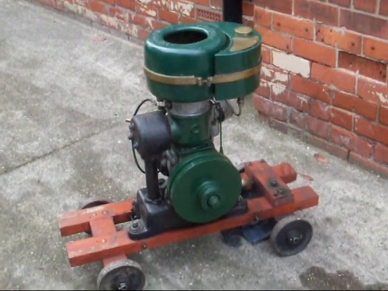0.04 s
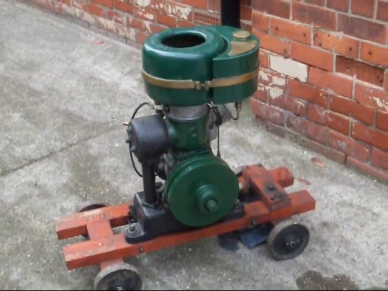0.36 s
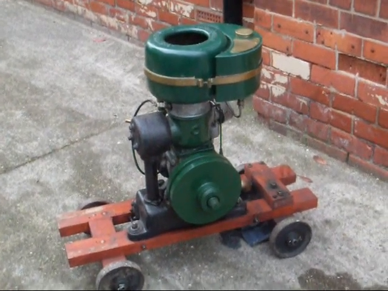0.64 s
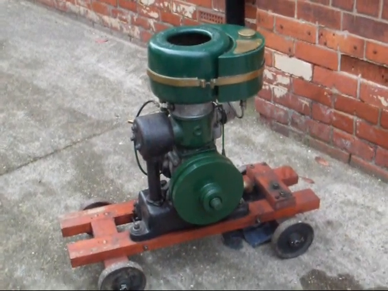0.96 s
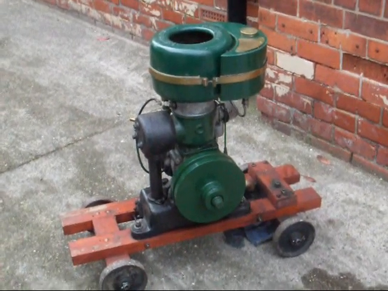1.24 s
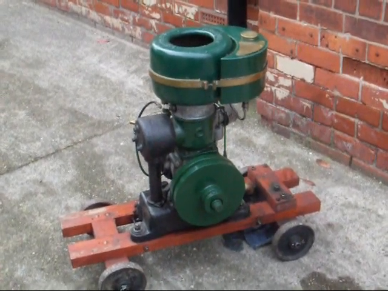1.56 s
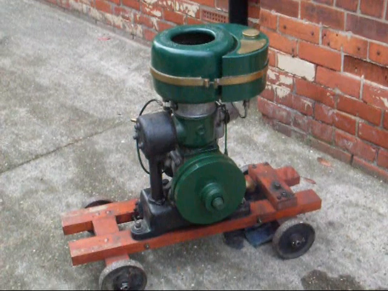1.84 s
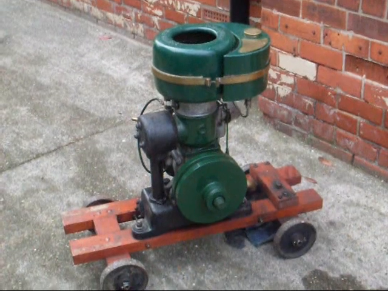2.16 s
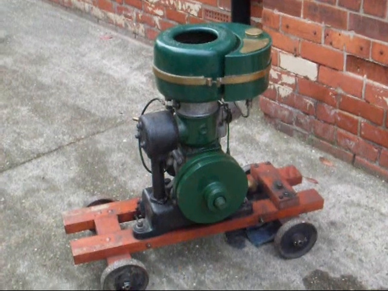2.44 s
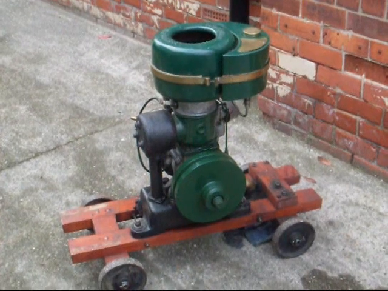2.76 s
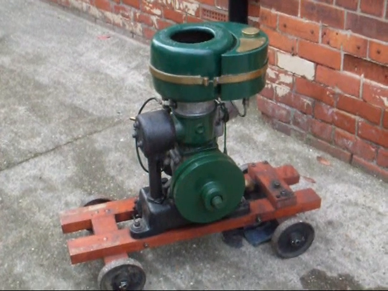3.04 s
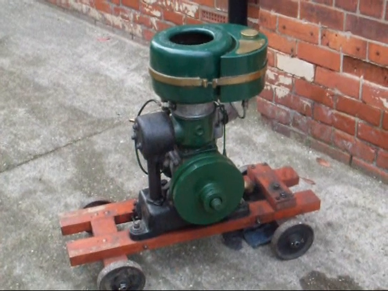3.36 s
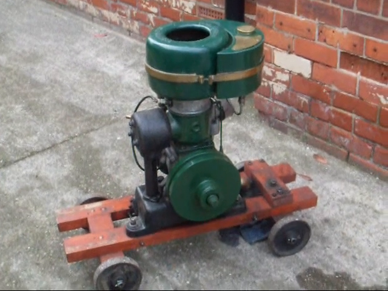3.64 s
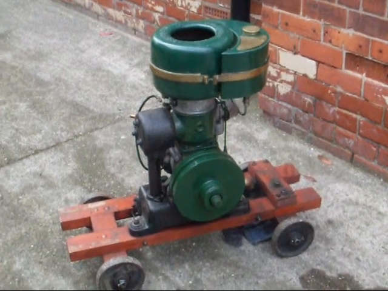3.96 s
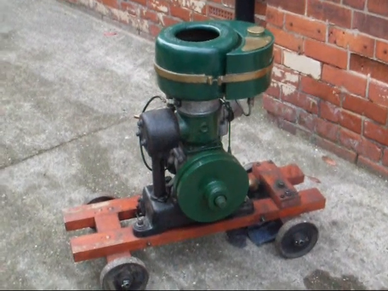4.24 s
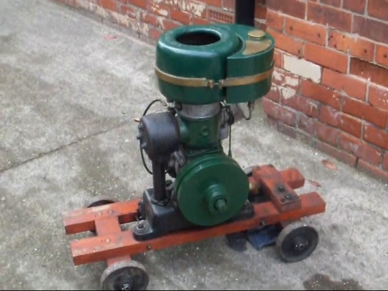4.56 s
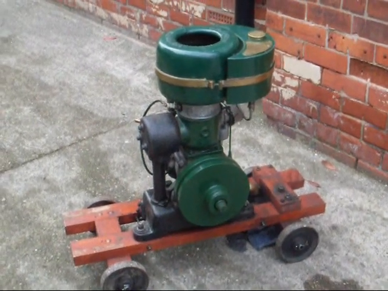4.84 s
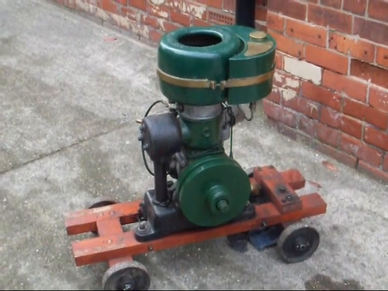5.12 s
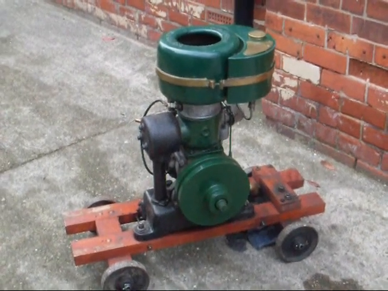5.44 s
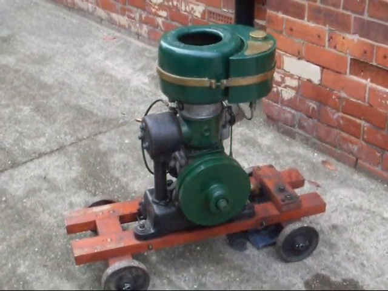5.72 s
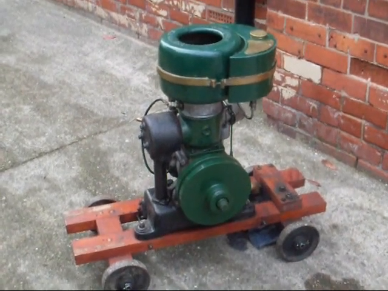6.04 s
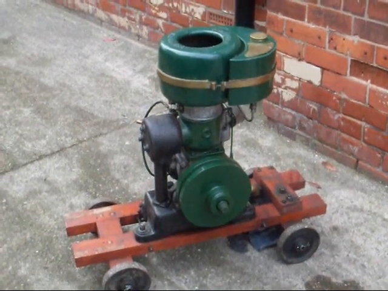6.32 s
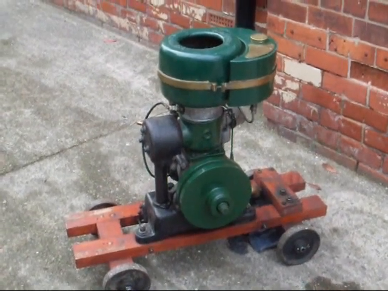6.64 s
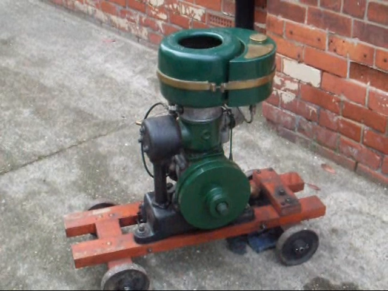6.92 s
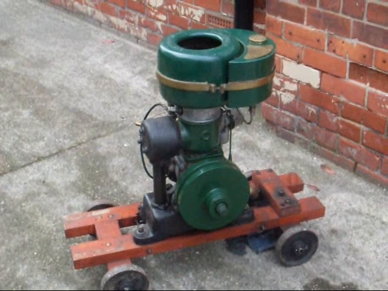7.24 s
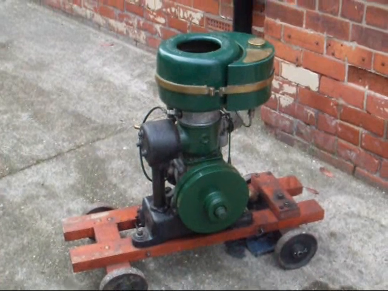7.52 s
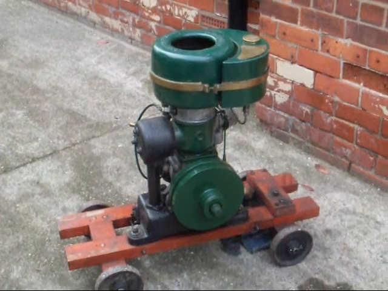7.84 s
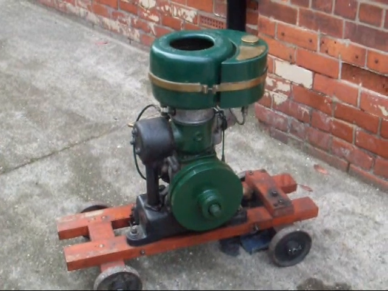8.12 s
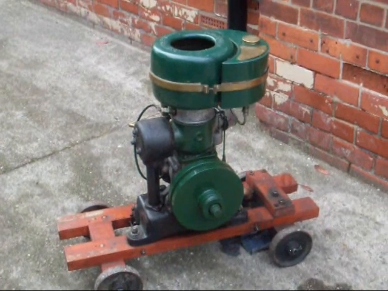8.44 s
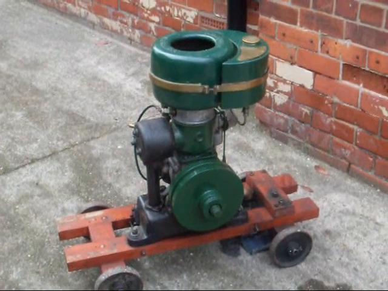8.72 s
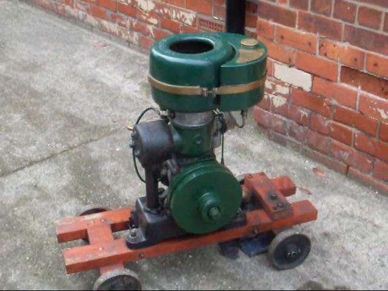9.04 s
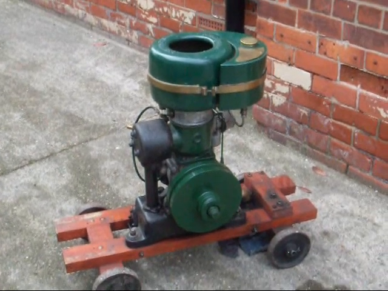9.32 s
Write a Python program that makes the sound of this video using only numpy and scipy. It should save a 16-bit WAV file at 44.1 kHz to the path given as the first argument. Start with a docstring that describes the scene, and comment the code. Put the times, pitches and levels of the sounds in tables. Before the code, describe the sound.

A small single-cylinder stationary engine idles outdoors with rapid low puffs, a mechanical churn and a pulsing, whistling intake hiss. About once a second it fires two or three sharp bangs, then coasts. Past the middle a faint whine rises, a quick run of bangs follows, and the hiss drops away for a while. Paired bangs return as wind gusts buffet the microphone, each bang echoing briefly around the yard.

```python
"""A small single-cylinder stationary engine idles on concrete beside a brick wall, about 17 turns a second.
Now and then a charge fires: a pressure pulse and a turbulent jet excite the exhaust pipe's resonances,
and between firings the crank coasts. On every turn, turbulence makes the intake hiss and whistle, and
the exhaust puffs; after one quick run of bangs the intake falls quiet for a while. The yard returns
echoes, a faint hum wavers, and gusts buffet the microphone."""
import sys
import numpy as np
from scipy import signal
from scipy.fft import rfft, irfft
from scipy.io import wavfile

SR = 44100
rng = np.random.default_rng(int(sys.argv[2]) if len(sys.argv) > 2 else 0)


def inscribe(sig):
    """Save sig as 16-bit PCM at rate SR to the path in sys.argv[1].

    A 1-D sig is mono; a 2-D sig holds one channel per row.
    Samples are clipped to [-1, 1] before scaling.
    """
    pcm = np.round(np.clip(np.atleast_2d(sig).T, -1, 1) * 32767)
    wavfile.write(sys.argv[1], SR, pcm.astype(np.int16))


N = 422478
TIME = np.arange(N) / SR
FILTER_HZ = np.fft.rfftfreq(8192, 1 / SR)
IDLE_TURNS_PER_S = 16.8

# Levels in the tables are relative: each source applies its own gain.
# gusts at the microphone: start_s, length_s, level_db
WIND_GUSTS = [(1.158, .017, -23.5), (1.322, 0.16, -37.5), (1.719, .075, -26.5), (2.238, .25, -41),
              (4.8, .18, -33.5), (5.294, 0.0089, -21.5), (5.718, 0.187, -39), (6.979, 0.05, -31),
              (7.023, 0.013, -26), (7.115, 0.13, -33), (7.256, 0.35, -30), (7.75, 0.018, -23),
              (8.104, 0.077, -17), (8.16, .12, -22), (8.284, 0.078, -23), (8.521, 0.13, -21),
              (8.712, 0.18, -29), (9.028, 0.25, -20), (9.069, .02, -15), (9.251, 0.45, -28),
              (9.356, 0.014, -20)]
# envelope of the hum: time_s, level_db
HUM_LEVEL = [(0, -58), (2, -49), (4.5, -50), (5.2, -68), (9.6, -57)]
# reflections from ground, wall and house: delay_s, gain
REFLECTIONS = [(.0016, 1), (.0039, -1.4), (.0061, 0.98), (0.0174, -0.34), (0.0193, 0.22), (0.0205, 0.64),
               (0.036, 0.32)]
# reverberation time of the yard: frequency_hz, t60_s
YARD_DECAY = [(100, 0.82), (300, 0.31), (620, 0.055), (1400, 0.15), (3700, 0.33), (10000, 0.25)]
# broad spectra of the noises and pulses: frequency_hz, level_db
WIND_SPECTRUM = [(20, -40), (60, -2.5), (130, 2), (250, 3), (450, -3), (700, -9.5), (1200, -20),
                 (2500, -60), (11000, -65)]
CHURN_SPECTRUM = [(20, -12), (35, -1), (55, 7), (130, 5.5), (210, -13.5), (450, -5), (1000, -5), (1500, -6),
                  (2100, -13), (3400, -16), (5500, -23.5), (8000, -24.5), (11000, -32)]
PUFF_SPECTRUM = [(20, -19), (35, -8), (50, 0), (65, 1.5), (100, -3.5), (150, 1), (210, -11), (400, -12),
                 (900, -40), (3000, -48), (11000, -64)]
HISS_SPECTRUM = [(30, 2), (300, -2.5), (600, 8), (1200, 5), (2000, 4), (2800, 7.5), (4200, -5.5),
                 (5300, -27.5), (7000, -19.5), (11000, -52)]
SIZZLE_SPECTRUM = [(30, -50), (3000, -5), (5300, -5), (6300, -4.5), (8000, 2.5), (9500, -7.5),
                   (11000, -4.5)]
CRACK_SPECTRUM = [(30, -29), (250, -10), (700, -1), (1100, -3), (2000, -7.5), (2700, -6.5), (3600, -9),
                  (5000, -9), (6200, -14.5), (8200, -12.5), (10000, -14), (11000, -14.5)]
THUMP_SPECTRUM = [(25, -70), (60, -4), (120, -6), (250, 1), (420, 1.5), (680, 1.5), (900, -0.5),
                  (1400, -10.5), (3000, -53), (11000, -79)]
# resonances of the iron casing and of the exhaust pipe: centre_hz, width_hz, gain_db
CASING_MODES = [(422.5, 20, 8.4), (587, 68, 6.4), (775, 7.6, 10.3), (985, 74, 6.6), (1216, 71, 5.3),
                (1410, 40, 2.9), (1723, 25, 8.3), (2550, 280, 4.5)]
PIPE_MODES = [(100, 55, 13), (136, 67, 3), (245.4, 30, 10.5), (296, 27, 5), (410, 94, 9), (550, 38, 7),
              (615, 210, 1), (740, 133, 3.5), (787, 67, 4.5), (910, 160, 4), (1280, 48, 3),
              (1470, 230, 2.5), (1710, 70, 9), (1840, 24, 8.5), (2343, 107, 7), (2537, 350, 4),
              (2712, 98, 8), (2900, 190, -3.5), (3550, 230, 8.5), (4270, 22, 4), (7180, 230, 5.5),
              (8240, 61, 7.5)]
# strength of the suction, which collapses after the quick run: time_s, level_db
SUCTION = [(0, -1.5), (1.8, 1.5), (3.4, 0.5), (5.5, 1.5), (6.05, -1), (6.6, -5), (6.85, -15), (7.5, -12),
           (7.85, -8.5), (8.5, -6.5), (8.95, 1), (9.6, 0.5)]
# air speed at the throttle, as the level of the throat tones: time_s, level_db
THROTTLE_FLOW = [(0, -14), (4.4, -13), (4.9, -7), (5.3, -3), (5.7, 0), (6.0, -3), (6.4, -2), (6.65, -18),
                 (8.5, -18), (9.6, -13)]
# tones of the carburettor throat: pitch_hz, level_db
THROAT_TONES = [(1240, -33.5), (1420, -42.5), (2140, -38.5), (2720, -41), (3200, -39), (4100, -34)]
# intake whistle: time_s, pitch_hz
WHISTLE_PITCH = [(.4, 6850), (.85, 6940), (1.15, 6840), (1.75, 6900), (3.0, 7075), (3.7, 7050), (6.0, 7270),
                 (7.6, 7050), (8.8, 6980), (9.5, 7030)]
# thin whine while the engine labours: time_s, level_db, pitch_hz
LABOUR_WHINE = [(4.6, -74, 3900), (5.0, -62, 3800), (5.4, -55, 3760), (5.85, -52, 3720), (6.2, -55, 3660),
                (6.6, -85, 3650)]
# fired charges: start_s, coasted_turns (since the last firing; rounded in use), crack_db, thump_offset_db
FIRINGS = [(0.0014, 0, -10, -3), (0.0594, 0.5, -18, -1), (0.115, 1, -26, -5), (0.8628, 13, -24, -0.5),
           (0.9213, 1.5, -10, -2.5), (0.9789, 1.5, -29.5, 0), (1.8003, 14, -21.5, -3.5),
           (1.8594, 1.5, -13, -1.5), (1.919, 1, -21, -2.5), (2.6799, 13, -12, -2), (2.74, 0, -18, 0),
           (2.8528, 2, -20, -6), (3.2577, 7, -21, -5), (3.3174, 1, -22.5, -1.5), (3.7942, 8, -12.5, 0),
           (3.8541, 1, -17, -4), (3.9113, 0.5, -26.5, -2), (4.6947, 13, -22.5, -5.5),
           (4.7552, 1, -15, -0.5), (5.6029, 13, -19.5, -1.5), (6.0394, 6, -20.5, -2), (6.115, 1, -13, -1.5),
           (6.1857, 0.5, -16.5, -1.5), (6.2526, 0, -18, -4), (6.314, 1, -16.5, -2.5),
           (6.375, 0.5, -17.5, -3), (6.4308, 0, -17, -3), (6.4849, 1, -15.5, -1), (6.538, 2.5, -20, -5.5),
           (6.5925, 0.5, -32, 7), (6.644, 0.5, -35.5, 6), (7.8933, 22, -7.5, -4.5), (7.9512, 3, -23.5, 0),
           (8.6593, 12.5, -12.5, -3), (8.7817, 2, -18.5, -2), (9.207, 7, -10, -2), (9.3254, 2.5, -21, -2)]


def amp(db):
    """Amplitude ratio of a level in decibels."""
    return 10 ** (np.asarray(db) / 20)


def spectrum_at(points, hz):
    """Linear interpolation on a logarithmic frequency axis."""
    point_hz, value = np.transpose(points)
    return np.interp(np.log(hz + 1), np.log(point_hz), value)


def curves(rows):
    """Linear interpolation in time of each column of a table."""
    time_s, *columns = np.transpose(rows)
    return [np.interp(TIME, time_s, column) for column in columns]


def add(mix, start_s, sound):
    """Superposition of a sound on the mix."""
    part = mix[max(round(start_s * SR), 0):][:len(sound)]
    part += sound[:len(part)]


def wander(cutoff_hz):
    """Random modulation: low-passed noise of rms 1."""
    rolloff = 1 + (np.fft.rfftfreq(N, 1 / SR) / cutoff_hz) ** 4
    drift = irfft(rfft(rng.standard_normal(N)) / rolloff, N)
    return drift / np.sqrt(np.mean(drift ** 2) + 1e-20)


def tone(hz, jitter_rad, jitter_hz):
    """Random phase modulation broadens the spectral line of a sine of rms 1."""
    return np.sqrt(2) * np.sin(2 * np.pi * np.cumsum(hz) / SR + jitter_rad * wander(jitter_hz))


def colour(x, spectrum, modes=()):
    """Minimum-phase filter of unit energy: a broad spectrum with resonance peaks on top."""
    peaks_db = sum(db / (1 + (2 * (FILTER_HZ - hz) / width) ** 2) for hz, width, db in modes)
    db = spectrum_at(spectrum, FILTER_HZ) + peaks_db
    log_gain = np.log(amp(np.r_[db, db[-2:0:-1]]))
    response = np.exp(np.conj(signal.hilbert(log_gain)))
    taps = np.fft.ifft(response).real[:len(FILTER_HZ)]
    return signal.oaconvolve(x, taps / np.linalg.norm(taps))[:N]


def resonator(x, hz, width_hz):
    """A double-pole resonance of unit energy passes a narrow band around a moving pitch."""
    carrier = np.exp(2j * np.pi * np.cumsum(hz) / SR)
    pole = np.exp(-np.pi * width_hz / SR)
    energy = (1 + pole ** 2) / (1 - pole ** 2) ** 3
    baseband = signal.lfilter([1], [1, -2 * pole, pole ** 2], x / carrier + 1e-18)
    return (carrier * baseband).real * np.sqrt(2 / energy)


def wind(slaps_per_s=70, breeze_db=-49, swell_db=3.5):
    """Turbulent pressure at the microphone: a low rumble, with single eddies slapping in each gust."""
    gusts = np.zeros(N)
    for start_s, length_s, db in WIND_GUSTS:
        add(gusts, start_s, amp(db) * signal.windows.tukey(int(length_s * SR), .5))
    eddies = amp(2.7 * wander(45)) * rng.standard_normal(N)
    slaps = (rng.random(N) < slaps_per_s / SR) * rng.choice([-1, 1], N) * np.sqrt(SR / slaps_per_s)
    breeze = amp(breeze_db + swell_db * wander(3.7))
    return colour((amp(-7.5) * gusts + breeze) * eddies + amp(-3) * gusts * slaps, WIND_SPECTRUM)


def hum(pitch_hz=436):
    """A faint tone wavers by slow amplitude and phase modulation."""
    level = amp(curves(HUM_LEVEL)[0] + 2 * wander(11.4))
    return level * tone(np.full(N, pitch_hz), jitter_rad=1.23, jitter_hz=9.7)


def yard(x, build_s=0.008, tails=3):
    """Diffuse reverberation: each band decays at its own rate; moving air shifts sound between tails."""
    out = np.zeros(N)
    for k in range(tails):
        hz, t, bands = signal.stft(rng.standard_normal(SR // 2), SR, nperseg=256)
        decay = amp(-60 * t / spectrum_at(YARD_DECAY, hz)[:, None])
        tail = signal.istft(bands * decay, SR, nperseg=256)[1]
        tail *= 1 - np.exp(-np.arange(len(tail)) / SR / build_s)
        share = np.sqrt(2 / tails) * np.cos(np.pi * (.7 * TIME + k / tails))
        out += signal.oaconvolve(share * x, tail / np.linalg.norm(tail))[:N]
    return out


def reflect(x):
    """Specular reflection: hard surfaces close by each return a delayed copy."""
    out = np.zeros(N)
    for delay_s, gain in REFLECTIONS:
        add(out, delay_s, gain * x)
    return out


def crank(drag_turns_per_s2=2.18):
    """Uniform deceleration: the crank makes the listed whole turns between firings, slowing slightly."""
    firing_s, coasted = np.transpose(FIRINGS)[:2]
    firing_s = np.r_[firing_s, firing_s[-1] + 10 / IDLE_TURNS_PER_S]  # ten turns after the last firing
    # the strokes pause where the count rounds to zero
    whole_turns = np.cumsum(np.r_[np.round(coasted), 10])
    last = np.maximum(np.searchsorted(firing_s, TIME) - 1, 0)
    ahead = drag_turns_per_s2 / 2 * (TIME - firing_s[last]) * (firing_s[last + 1] - TIME)
    return np.interp(TIME, firing_s, whole_turns) + ahead


def glide(turns, centre):
    """A sawtooth falling from +1 to -1 over each turn, through zero at the centre angle."""
    return -2 * ((turns - centre + .5) % 1 - .5)


def port(turns, centre, width):
    """Periodic gating: a port opens once a turn around the centre angle."""
    return np.exp(-np.abs(glide(turns, centre) / width) ** 3)


def once_a_turn(turns, angle):
    """An impulse train: one unit click each time the crank passes an angle."""
    return np.diff(np.floor(turns - angle), prepend=np.floor(-angle))


def churn(turns):
    """Broadband noise of flywheel, bearings and gas excites the casing's modes, swelling once a turn."""
    swell = amp(1.14 * wander(4.6) + 2.1 * np.cos(2 * np.pi * (turns - .69)))
    return amp(-38) * colour(swell * rng.standard_normal(N), CHURN_SPECTRUM, CASING_MODES)


def chuff(turns):
    """Pressure pulses form a low exhaust puff once a turn: a quick dip, a push, then a faint rebound."""
    dip = amp(-12) * once_a_turn(turns, 0.99)
    push = amp(-13.5) * once_a_turn(turns, 0.067)
    rebound = amp(-23.5) * once_a_turn(turns, 0.482)
    strength = amp(7 + 0.32 * curves(THROTTLE_FLOW)[0] + 0.94 * wander(13))
    return colour(strength * (push - dip - rebound), PUFF_SPECTRUM, modes=[(146.6, 149, 2.46)])


def suction_gain(turns, base_db, exponent, scatter_db):
    """Amplitude follows a power of the suction, with random scatter from stroke to stroke."""
    stroke = turns.astype(int).clip(0)
    scatter = rng.standard_normal(stroke.max() + 1)[stroke]
    return amp(base_db + exponent * curves(SUCTION)[0] + scatter_db * scatter)


def intake(turns, ring_hz=3430, chirp_depth=0.171):
    """Flow noise: each suction stroke hisses, rings the carburettor throat and blows a high whistle."""
    throttle_db, = curves(THROTTLE_FLOW)
    opening_db = np.maximum(throttle_db + 16, 0)
    # a slow crank draws air over a smaller part of its turn
    span = np.maximum(np.gradient(turns) * SR, 10) / IDLE_TURNS_PER_S
    flow = port(turns, centre=0.64, width=0.34 * span ** 0.34) * amp(1.13 * wander(12.3))
    turbulence = flow * rng.standard_normal((3, N))
    hiss = colour(turbulence[0], HISS_SPECTRUM, CASING_MODES[4:])
    hiss *= suction_gain(turns, base_db=-37.5, exponent=0.72, scatter_db=0.39)
    sizzle = colour(turbulence[1], SIZZLE_SPECTRUM)
    sizzle *= suction_gain(turns, base_db=-40.5, exponent=1.64, scatter_db=0.79)
    # opening the throttle strengthens the mid-stroke ping and spoils the whistle
    ping = tone(ring_hz * (1 + 0.0076 * wander(12.13)), jitter_rad=0.69, jitter_hz=92)
    ping *= port(turns, centre=0.64, width=.2 * span) * amp(0.22 * opening_db)
    ping *= suction_gain(turns, base_db=-40.5, exponent=1, scatter_db=3.8)
    whistle_hz = curves(WHISTLE_PITCH)[0] * (1 - 0.038 * glide(turns, centre=0.7))
    whistle = resonator(turbulence[2], whistle_hz, width_hz=300) * amp(-0.7 * opening_db)
    whistle *= suction_gain(turns, base_db=-39.5, exponent=1.94, scatter_db=1.19)
    # the throat tones chirp downward as the suction fades, a little differently on every stroke
    chirp = 1 + chirp_depth * glide(turns, centre=.615) + .012 * wander(9.1)
    throat = sum(amp(throttle_db + db + 2 * wander(9)) * tone(hz * chirp, jitter_rad=.6, jitter_hz=200)
                 for hz, db in THROAT_TONES)
    throat *= port(turns, centre=0.611, width=.16 * span)
    return hiss + sizzle + ping + whistle + throat


def whine():
    """A thin, randomly modulated tone swells and sinks in pitch while the engine labours."""
    level_db, pitch_hz = curves(LABOUR_WHINE)
    return amp(level_db + 2 * wander(20)) * tone(pitch_hz, jitter_rad=1.6, jitter_hz=45)


def pipe_note(impulses, cool_hz=600, hot_hz=632, cooling_s=0.16, t60_s=0.59, build_s=.03):
    """The pipe's air column rings on after firings; its pitch sags as cooling lowers the sound speed."""
    t = np.arange(SR) / SR
    envelope = amp(-60 * t / t60_s) * (1 - np.exp(-t / build_s))
    level = signal.oaconvolve(impulses, envelope)[:N]
    since_firing_s = TIME - np.maximum.accumulate(TIME * (impulses > 0))
    pitch_hz = cool_hz + (hot_hz - cool_hz) * np.exp(-since_firing_s / cooling_s)
    return level * tone(pitch_hz, jitter_rad=.3, jitter_hz=13)


def bangs(rise_s=0.002, fall_s=0.0061, blowdown_s=0.038, push_s=0.00038, lead_s=.0008):
    """Impulsive excitation: a fired charge drives the pipe's modes with a pulse and a decaying jet."""
    t = np.arange(SR // 2) / SR
    decay = np.exp(-t / fall_s) + amp(-13) * np.exp(-t / blowdown_s)
    jet = (1 - np.exp(-t / rise_s)) ** 2 * decay
    pulse = (1 - t / push_s) * np.exp(-t / push_s)
    crack, thump, impulses = np.zeros((3, N))
    for start_s, _, crack_db, thump_offset_db in FIRINGS:
        turbulence = jet * rng.standard_normal((2, len(t)))
        strength = amp(crack_db + thump_offset_db)
        add(crack, start_s - lead_s, amp(crack_db) * turbulence[0])
        add(thump, start_s, strength * (pulse + amp(-17) * turbulence[1]))
        add(impulses, start_s, [strength])
    crack = amp(3.5) * colour(crack, CRACK_SPECTRUM, PIPE_MODES)
    thump = amp(2.5) * colour(thump, THUMP_SPECTRUM, PIPE_MODES)
    # rough brick scatters the treble, so the crack has weaker single echoes than the thump
    echoes = 0.076 * reflect(crack) + reflect(thump)
    return crack + thump + echoes + amp(-19) * pipe_note(impulses)


def scene():
    """Superposition of the engine's direct sound, the yard's reverberation, the hum and the wind."""
    turns = crank()
    suction = intake(turns) + whine()
    firing = bangs()
    reverberation = yard(amp(-8) * suction + amp(-6.5) * firing)
    return (suction + firing + chuff(turns) + churn(turns) + hum() + reverberation + wind())[None]


def record(dry, edge_hz=15550):
    """Spectral imaging: sampling at half rate mirrors the treble upward; clipping and a low-pass follow."""
    low_band = signal.oaconvolve(dry[0], signal.firwin(127, SR / 4, fs=SR), "same")
    mirror = low_band * (-1) ** np.arange(N)
    droop_db = spectrum_at([(11000, -0.5), (13500, -2.0), (15500, -6.5)], np.fft.rfftfreq(N, 1 / SR))
    mirror = irfft(rfft(mirror) * amp(droop_db), N)
    band_limit = signal.firwin(401, edge_hz, window=("kaiser", 7), fs=SR)
    return signal.oaconvolve(np.clip(low_band + mirror, -1, 1), band_limit, "same")[None]


dry = scene()
out = record(dry)
inscribe(out)
```